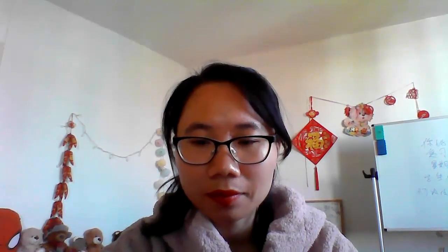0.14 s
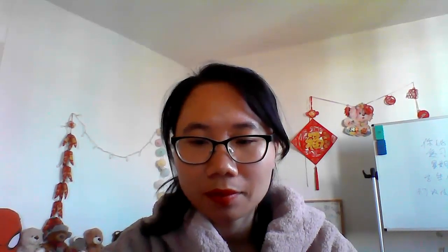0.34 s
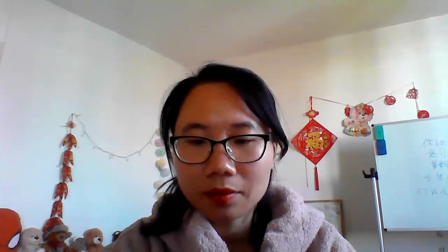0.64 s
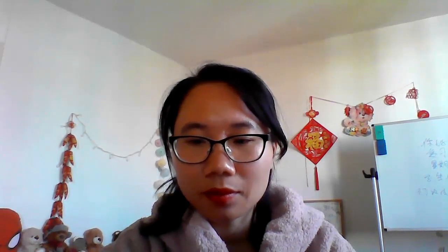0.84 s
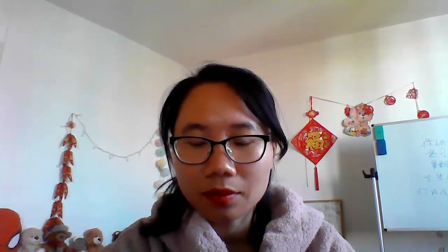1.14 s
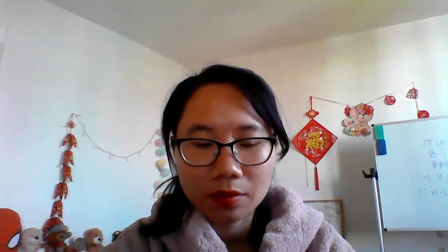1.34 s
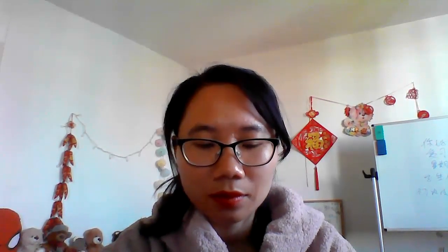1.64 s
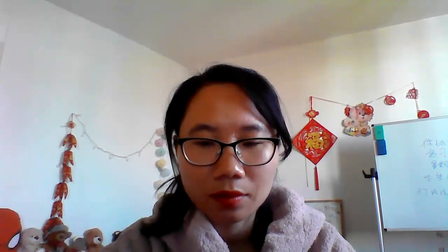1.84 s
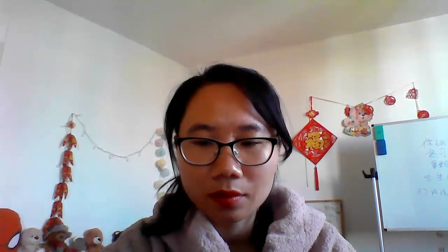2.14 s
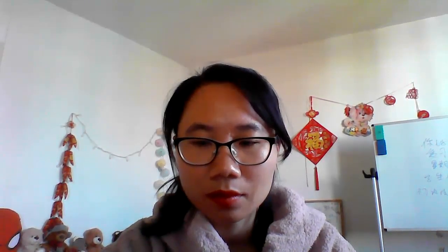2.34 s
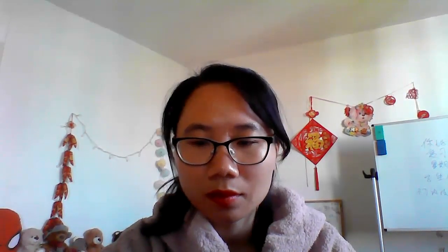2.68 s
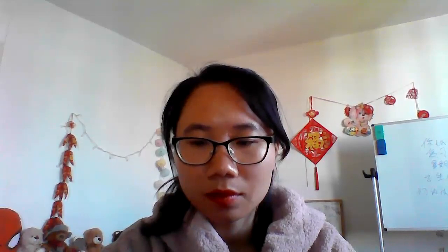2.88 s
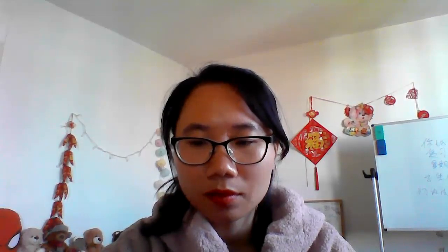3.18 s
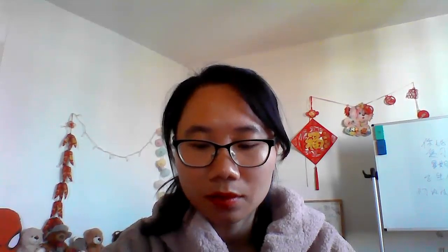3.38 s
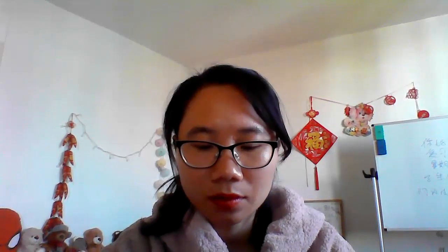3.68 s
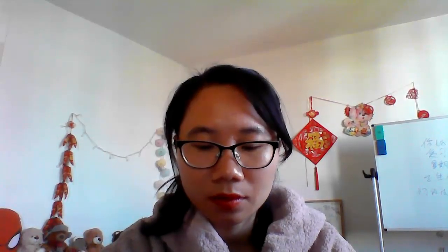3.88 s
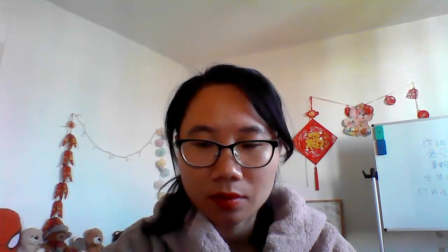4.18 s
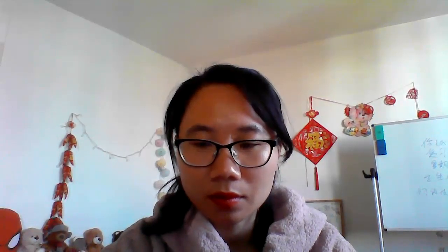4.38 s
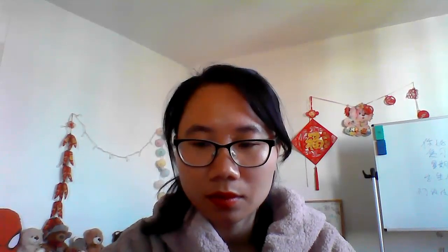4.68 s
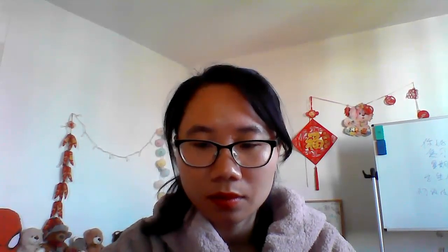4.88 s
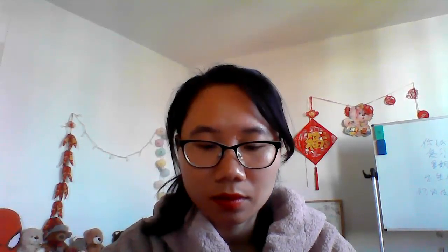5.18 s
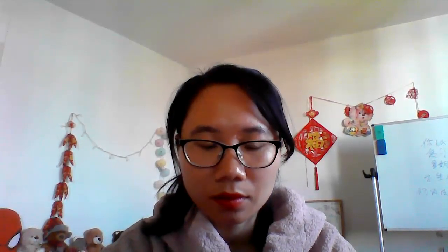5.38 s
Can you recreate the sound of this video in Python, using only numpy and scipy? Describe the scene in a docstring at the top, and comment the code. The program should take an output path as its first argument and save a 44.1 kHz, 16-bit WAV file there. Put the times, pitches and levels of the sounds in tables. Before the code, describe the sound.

Close, crisp typing on a plastic keyboard, a few sharp keystrokes among lighter taps, over faint room hum.

```python
"""In a quiet room, fingers type short runs on a plastic keyboard close to a small microphone.
Each key scrapes, cracks against its stop and rattles out while its plastic cap rings.
The blow also thumps into the keyboard case and the desk. A faint hum, whirr, putter and hiss
lie underneath, and the sound drops out once for a moment."""
import sys
import numpy as np
from scipy import signal
from scipy.fft import rfft, irfft
from scipy.io import wavfile

SR = 44100
rng = np.random.default_rng(int(sys.argv[2]) if len(sys.argv) > 2 else 0)


def bounce(signal):
    """Save signal as a 16-bit WAV file at the path given by the first command-line argument."""
    frames = np.transpose(np.atleast_2d(signal))
    limited = np.clip(frames, -1, 1)
    pcm = np.round(limited * 32767).astype(np.int16)
    wavfile.write(sys.argv[1], SR, pcm)


N = 243431

# Keys making contact. Each row: start in seconds, relative levels in dB of the top (8-17 kHz),
# treble (5-8 kHz) and middle (0.9-2.5 kHz), pitch of the cap's ping in Hz, fade time of the crack
# in seconds, level in dB of the wash (the soft noise after the crack) compared with the crack.
KEY_CONTACTS = [(0.049, -44.5, -55.5, -67, 6380, 0.023, -17.5),
                (0.0757, -45.5, -73, -70.5, 6400, 0.013, -15), (0.188, -58, -67.5, -72, 6550, 0.033, -13),
                (0.2204, -40.5, -63.5, -66.5, 6790, 0.017, -25),
                (0.604, -0.5, -13, -22.5, 5125, 0.014, -23), (0.6127, -18, -52, -40, 5330, .012, -13),
                (0.6705, -31, -46, -65, 7000, 0.015, -3), (0.6949, -19.5, -26.5, -56.5, 6880, 0.063, -23),
                (0.702, -16.5, -32, -62, 6770, 0.0044, -16.5),
                (1.3767, -33.5, -61, -64.5, 6290, 0.027, -18),
                (1.3862, -20.5, -39.5, -53, 6240, 0.006, -14.5), (1.3997, -14, -27, -53, 6280, 0.015, -29),
                (1.5046, -42, -56.5, -68.5, 6380, 0.016, -8), (1.5674, -43.5, -57, -68, 6400, .02, -9),
                (1.697, -77, -47.5, -52.5, 5900, 0.084, -10), (1.713, -48, -47, -70, 4930, 0.094, -7.5),
                (1.7436, -38, -58, -66, 6800, 0.018, -6), (1.755, -29, -40.5, -64.5, 4900, 0.065, -20),
                (1.8887, -13, -30.5, -74, 6280, 0.014, -24), (1.9183, -39, -55, -68.5, 6100, .049, -18),
                (2.0106, -47, -69, -76, 6770, 0.01, -7), (2.0464, -35, -53, -70, 6270, 0.014, -17),
                (2.0543, -29, -47.5, -76, 6770, 0.018, -26), (2.0852, -33.5, -49, -69, 6160, 0.029, -17),
                (2.096, -45.5, -65, -65, 6400, 0.025, -11), (2.1692, -55, -72, -80, 6890, .022, -6),
                (2.303, -35, -48.5, -74, 5320, 0.019, -15.5), (2.3096, -40.5, -65.5, -69.5, 5200, .03, -13),
                (2.4058, -45, -58.5, -66, 5520, 0.023, -13.5),
                (2.5322, -37.5, -52.5, -71.5, 6150, 0.038, -14),
                (2.6134, -50.5, -68, -66.5, 6020, 0.018, -13), (2.8508, -55, -77, -76.5, 4830, .022, -18),
                (3.1223, -6, -18, -25.5, 5126, 0.017, -22), (3.1984, -12.5, -23, -51, 6420, 0.037, -19),
                (3.6586, -29.5, -45, -68, 7530, 0.031, -12.5), (3.675, -40.5, -55, -65, 6460, 0.027, -10),
                (3.7559, -32, -54, -62.5, 5530, 0.028, -17.5), (3.9921, -38, -48, -65.5, 5610, 0.031, -12),
                (4.0741, -42, -58.5, -70.5, 7020, 0.033, -12), (4.1973, -33, -50.5, -68, 5750, .027, -16),
                (4.2318, -47.5, -69, -63.5, 6880, 0.032, -10.5), (4.275, -54.5, -72, -70, 5970, .03, -9),
                (4.3725, -49, -71, -66.5, 6820, .022, -14.5),
                (4.3827, -40.5, -57, -54.5, 6120, 0.017, -8.5),
                (4.4706, -40, -60.5, -69.5, 7440, .014, -11.5),
                (4.803, -9.5, -20.5, -47.5, 6510, 0.023, -25),
                (4.8112, -24, -35, -52.5, 4970, 0.028, -11.5), (4.8903, -17, -26, -50, 6670, 0.017, -15.5),
                (4.8959, -22, -37, -52, 6760, 0.043, -24), (5.021, -30, -50.5, -58, 5100, 0.028, -14.5),
                (5.0624, -45, -61.5, -69, 6860, .03, -8.5), (5.2076, -31, -55, -65, 6950, .03, -13),
                (5.2173, -38, -45.5, -69, 6970, 0.019, -18),
                (5.2241, -35, -50.5, -62.5, 6900, 0.023, -12.5), (5.277, -53, -67, -75, 5200, .04, -7.5),
                (5.4215, -40, -57, -69.5, 5580, 0.027, -11), (5.5134, -44.5, -58.5, -71.5, 4300, .022, -18)]
WASH_FADE_S = .21


def from_db(db):
    return 10 ** (np.asarray(db) / 20)


def rms_one(x):
    """Scale a sound to an average power of 1."""
    return x / np.sqrt(np.mean(x ** 2) + 1e-20)


def band(x, low_hz, high_hz, order=2):
    return signal.sosfilt(signal.butter(order, [low_hz, high_hz], "band", fs=SR, output="sos"), x)


def resonance(x, hz, width_hz):
    """Let one pitch through at full strength and weaken the rest."""
    r = np.exp(-np.pi * width_hz / SR)
    feedback = [1, -2 * r * np.cos(2 * np.pi * hz / SR), r * r]
    return signal.lfilter([(1 - r * r) / 2, 0, (r * r - 1) / 2], feedback, x)


def dying(seconds, fade_s):
    """A fading curve. The fade time is how long it takes to fall by 60 dB."""
    return from_db(-60 * seconds / fade_s)


def add(out, start, piece):
    out[..., start:start + piece.shape[-1]] += piece


def through_bands(noises):
    """Narrow each of four noises to its own band, keeping its level."""
    # The top, treble, upper middle and middle bands. Each row: low edge in Hz, high edge in Hz.
    edges = [(8000, 17000), (5000, 8000), (2500, 5000), (900, 2500)]
    return [band(x, low, high, order=4) * np.sqrt(SR / 2 / (high - low))
            for x, (low, high) in zip(noises, edges)]


def room_tone():
    """The room's steady low hum, a faint whirr as of a small fan, and the microphone's hiss."""
    # The tone colour of the hum. Each row: frequency in Hz, relative level in dB.
    hum_curve = [(24, -44.5), (40, -18), (86, -17), (123, 2.5), (182, -3.5), (222, -11), (636, -21),
                 (694, -13), (1200, -21), (1460, -20), (1710, -22.5), (2890, -28), (7600, -39),
                 (9880, -69.5), (16700, -120)]
    # The noise bands of the whirr. Each row: centre in Hz, filter width in Hz, level in dB.
    whirr_bands = [(930, 42, -96), (1464, 220, -91), (3130, 530, -94.5)]
    curve_hz, curve_db = np.transpose(hum_curve)
    frequencies = np.fft.rfftfreq(N, 1 / SR) + 1
    colour = from_db(np.interp(np.log(frequencies), np.log(curve_hz), curve_db))
    hum = from_db(-74.5) * rms_one(irfft(rfft(rng.standard_normal(N)) * colour, N))
    noise = rng.standard_normal(N)
    whirr = sum(from_db(db) * rms_one(resonance(resonance(noise, hz, width), hz, width))
                for hz, width, db in whirr_bands)
    hiss = from_db(-84.5) * rms_one(band(noise, 8000, 17000, order=8))
    return hum + whirr + hiss


def putter(pulses_per_s=28, unevenness=.2, spread_db=2.5):
    """Soft, uneven low pulses, as of a small motor idling far off."""
    gaps, sizes = rng.standard_normal((2, 300))
    starts = np.cumsum(SR / pulses_per_s * np.clip(1 + unevenness * gaps, .3, 3)).astype(int)
    pulses = np.zeros(N)
    pulses[starts[starts < N]] = from_db(spread_db * sizes[starts < N])
    return from_db(-82) * rms_one(band(band(pulses, 110, 620), 110, 620))


def desk_thumps(desk_hz=89.55, upper_case_hz=285.2):
    """A finger's push makes desk and case ring: each tone swells, wavers and dies away."""
    # The blows. Each row: start in seconds, desk level in dB, case level in dB, case pitch in Hz,
    # knock level in dB, knock pitch in Hz. The levels are relative.
    blows = [(0.08, -63.5, -65, 156.5, -89, 821), (0.183, -67, -70, 266, -73.5, 617),
             (0.602, -47, -37, 229.7, -32, 888), (0.698, -64, -35, 197.6, -41.5, 1096),
             (1.424, -52.5, -62, 174, -68, 746), (1.508, -56, -54.5, 164.6, -54, 779),
             (1.538, -72.5, -63, 185, -62, 736), (1.709, -53.5, -51, 176.4, -50, 789),
             (1.76, -48.5, -45, 225, -50.5, 547), (1.889, -57.5, -57.5, 167.6, -54.5, 614),
             (1.916, -46, -51.5, 155.6, -63.5, 503), (2.052, -55.5, -57, 213, -71, 670),
             (2.109, -48, -70.5, 272, -81, 500), (2.331, -48, -69, 169, -84, 474),
             (2.408, -59.5, -66, 177, -88, 460), (2.541, -56, -59, 156, -66, 458),
             (2.601, -54.5, -65, 161, -72.5, 937), (2.698, -73, -70, 270, -56.5, 489),
             (2.852, -70, -68, 143, -86, 819), (3.121, -51, -35, 210.6, -32, 804),
             (3.2, -54, -36, 203.4, -40.5, 910), (3.665, -56, -62.5, 144, -51.5, 641),
             (3.765, -60, -62, 157.7, -64.5, 670), (4.001, -51, -60, 146, -67, 460),
             (4.017, -40.5, -59, 179, -81, 568), (4.078, -54, -64, 204, -92, 457),
             (4.2, -63, -55.5, 286.3, -69, 579), (4.302, -59, -64, 214, -79, 929),
             (4.382, -64.5, -58.5, 183.3, -53.5, 559), (4.488, -65, -84, 142, -74, 462),
             (4.804, -51.5, -49.5, 163, -49.5, 666), (4.888, -55.5, -37.5, 217, -43.5, 562),
             (5.063, -54.5, -53.5, 196, -50.5, 676), (5.209, -54, -56.5, 216, -70, 770),
             (5.234, -44, -55.5, 197.4, -71, 552), (5.289, -80, -68.5, 268, -61, 637),
             (5.447, -45, -60.5, 141, -82, 456)]
    # How the desk, case, upper case tone and knock ring, in that order.
    # Each row: swell time in seconds, fade time in seconds, amount of waver in radians.
    rings = [(0.0067, 0.12, 0.63), (0.0063, 0.16, 0.88), (0.0055, .08, 1.8), (.003, .1, 1.9)]
    tones, knock_strength = np.zeros((2, N + SR))
    after = np.arange(SR // 2) / SR
    for start_s, desk_db, case_db, case_hz, knock_db, knock_hz in blows:
        start = round(start_s * SR)
        levels_db = [desk_db, case_db, case_db - 1, knock_db]
        pitches = [desk_hz, case_hz, upper_case_hz, knock_hz]
        for db, hz, (swell_s, fade_s, waver_rad) in zip(levels_db, pitches, rings):
            # Vibrations close in pitch blur together, so the tone wavers.
            waver = waver_rad * np.interp(after, np.linspace(0, .5, 61), rng.standard_normal(61))
            swell = (1 - np.exp(-after / swell_s)) ** 2
            fade = dying(fade_s * (after / fade_s) ** 1.224, fade_s)   # holds, then dies faster
            strength = from_db(db + 2) * swell * fade
            tone = strength * np.sin(2 * np.pi * hz * after + waver)
            add(tones, start, tone)
        # The last tone is the knock. A hard blow trades part of it for many vibrations at once.
        hardness = np.clip((knock_db + 67.5) / 25, 0, 1)
        add(tones, start, -.7 * hardness * tone)
        add(knock_strength, start, hardness * strength)
    many_vibrations = rms_one(band(rng.standard_normal(N), 400, 1200))   # so dense they are noise
    return tones[:N] + from_db(-7.5) * knock_strength[:N] * many_vibrations


def cap_ring(clicks):
    """The plastic key caps ring at their own pitches when a click shakes them."""
    # The caps' resonances. Each row: pitch in Hz, width in Hz, gain in dB.
    caps = [(6270, 550, 1.5), (8670, 130, -20.5), (10163, 450, 0), (10730, 220, -6.5), (12770, 910, 1.5),
            (14900, 210, -2.5)]
    return sum((-1) ** k * from_db(db) * resonance(clicks, hz, width)
               for k, (hz, width, db) in enumerate(caps))


def cap_pings(rise_s=.0011, fade_s=.041):
    """Each struck cap gives one high ping, which flutters because the cap is loose."""
    pings = np.zeros(N + SR)
    after = np.arange(SR // 2) / SR
    rise = np.minimum(after / rise_s, 1)
    fade = dying(after, fade_s) + .02 * dying(after, WASH_FADE_S)
    for start_s, _, treble_db, _, hz, _, _ in KEY_CONTACTS:
        ping = rise * fade * np.sin(2 * np.pi * hz * after)
        add(pings, round(start_s * SR), from_db(treble_db + 1.5) * ping)
    flutter = rms_one(signal.lfilter([1], [1, -.97], rng.standard_normal(N)))
    return (1 + .84 * flutter) * pings[:N]


def key_clicks(grit_db=3.0):
    """A key scrapes, cracks against its stop, then leaves a smooth wash from case and room."""
    # The wash is duller than the crack. Each row: boost in dB for one band, from top to middle.
    wash_tilt = [
        [0.0],
        [1],
        [4.4],
        [6.7],
    ]
    sharp_power, wash_power = np.zeros((2, 4, N + SR))
    after = np.arange(SR // 2) / SR
    for start_s, top_db, treble_db, middle_db, _, crack_fade_s, wash_db in KEY_CONTACTS:
        start = round(start_s * SR)
        upper_middle_db = .55 * treble_db + .45 * middle_db - 1.5
        power = from_db([top_db, treble_db, upper_middle_db, middle_db])[:, None] ** 2
        scrape_s = .012 + .0001 * middle_db   # longer when the contact sounds fuller
        scrape_gain = from_db(-18 - .03 * top_db)   # a bigger share of a soft contact
        scrape_rise = np.linspace(.25, 1, int(scrape_s * SR)) ** 3
        add(sharp_power, start - len(scrape_rise), power * scrape_gain ** 2 * scrape_rise)
        add(sharp_power, start, power * dying(after, crack_fade_s) ** 2)
        wash_gain = from_db(wash_db + np.array(wash_tilt))
        add(wash_power, start, power * (wash_gain * dying(after, WASH_FADE_S)) ** 2)
    grit = rms_one(rng.standard_normal(N) * from_db(grit_db * rng.exponential(1, N)))
    smooth = rng.standard_normal(N)
    smooth += from_db(-8.5) * rms_one(resonance(smooth, 5900, 620))   # the hollow under the caps
    scrapes_and_cracks = np.sqrt(sharp_power[:, :N]) * grit
    wash = np.sqrt(wash_power[:, :N]) * smooth / 2
    top, treble, upper_middle, middle = through_bands(scrapes_and_cracks + wash + 1e-18)
    bright = top + treble
    ringing = bright + cap_ring(bright) + cap_pings()
    return from_db(-11) * ringing + from_db(-6) * upper_middle + from_db(-5.5) * middle


def scene():
    """Keys, desk and background together in one channel."""
    return (key_clicks() + desk_thumps() + room_tone() + putter())[None]


def record(dry, low_cut_hz=67, high_cut_hz=16200):
    """The sound drops out once; the microphone rounds peaks and loses deep bass and the very top."""
    # A steady boost that fades away briefly and snaps back. Each row: time in seconds, gain in dB.
    dropout = [(1.58, 6), (1.61, 4.5), (1.662, -17), (1.69, -40.5), (1.695, 6)]
    times, gains_db = np.transpose(dropout)
    heard = dry * from_db(np.interp(np.arange(N) / SR, times, gains_db))
    heard = signal.sosfilt(signal.butter(2, low_cut_hz, "high", fs=SR, output="sos"), heard)
    rounded = 1.6 * np.tanh(heard / 1.6)
    return signal.sosfilt(signal.cheby2(18, 60, high_cut_hz, fs=SR, output="sos"), rounded)


dry = scene()
out = record(dry)
bounce(out)
```